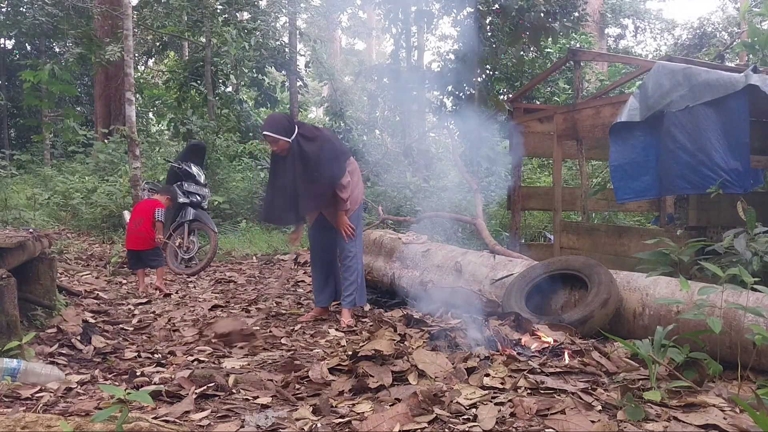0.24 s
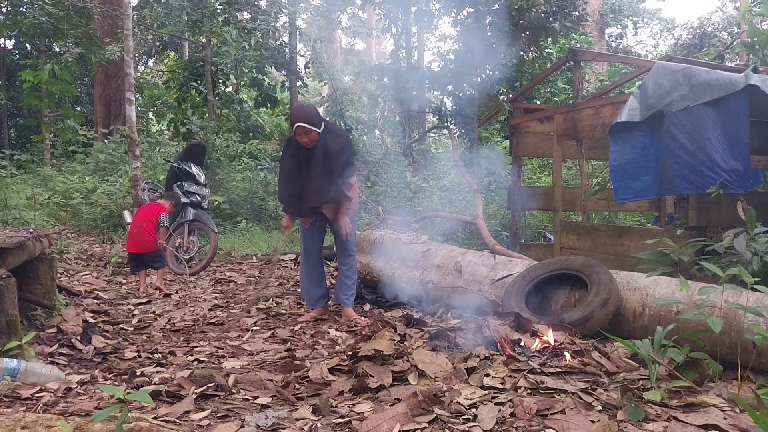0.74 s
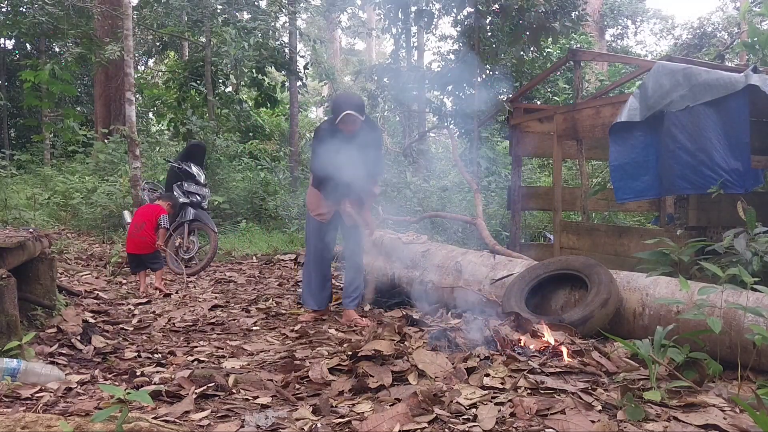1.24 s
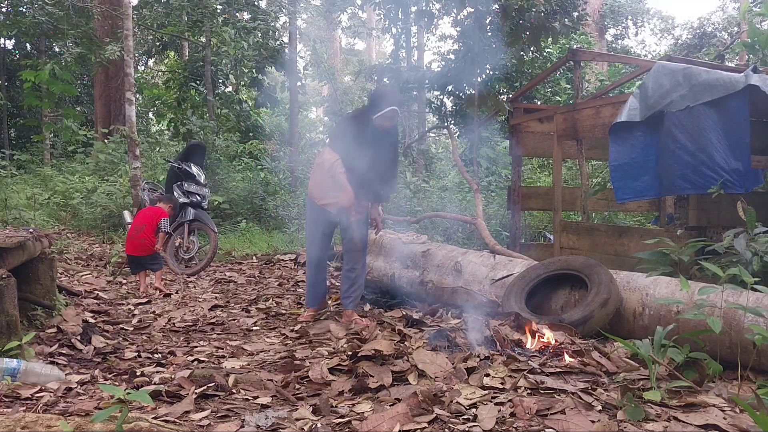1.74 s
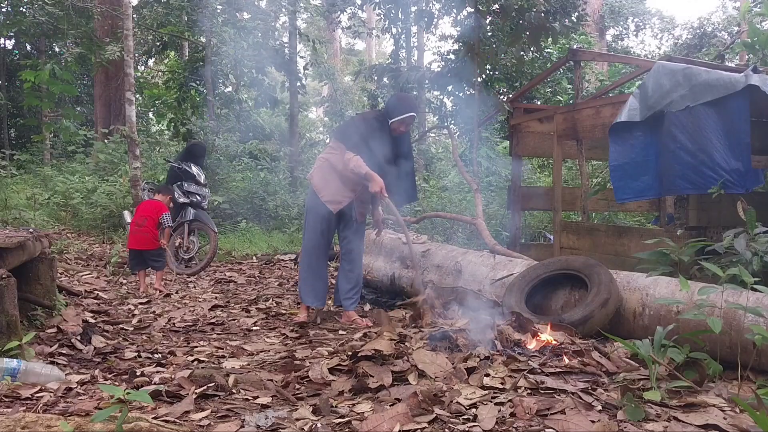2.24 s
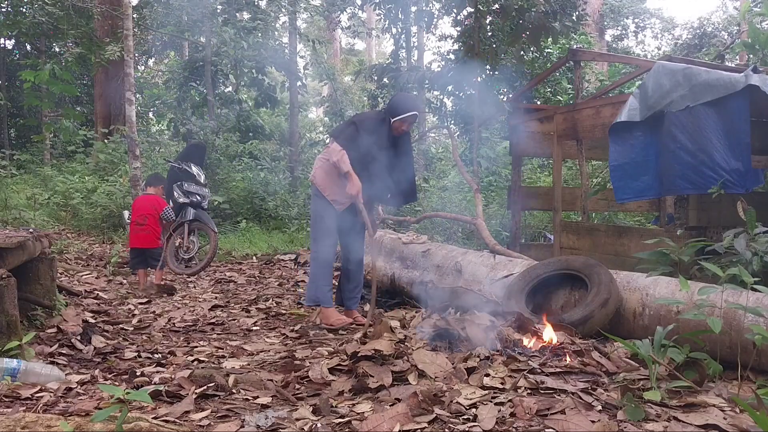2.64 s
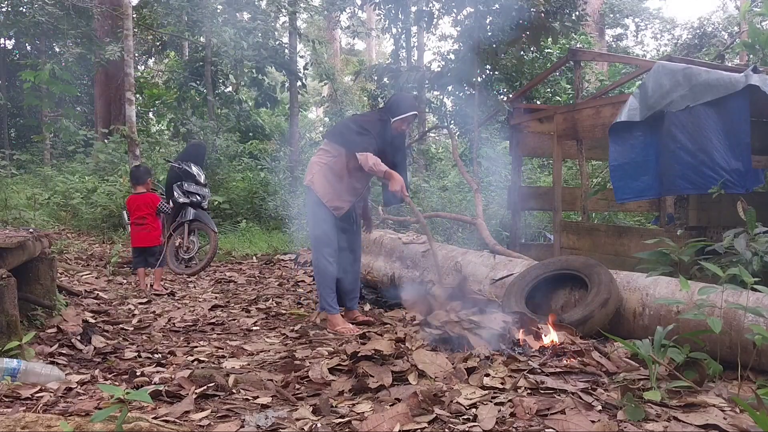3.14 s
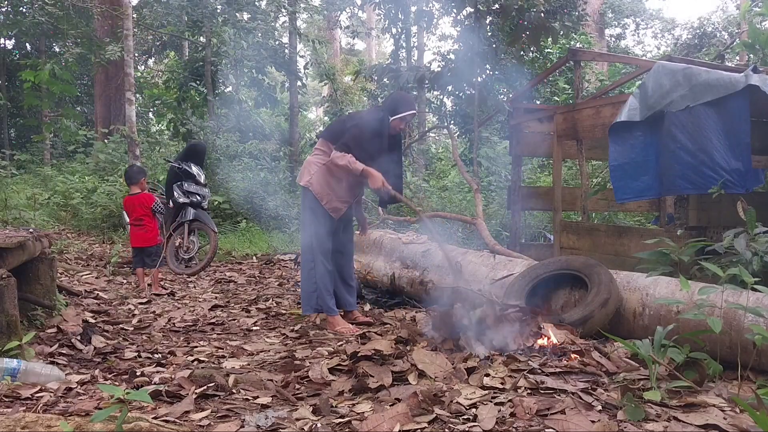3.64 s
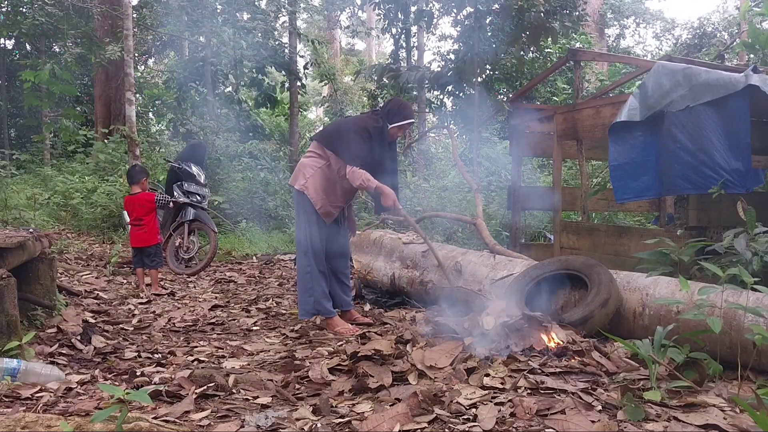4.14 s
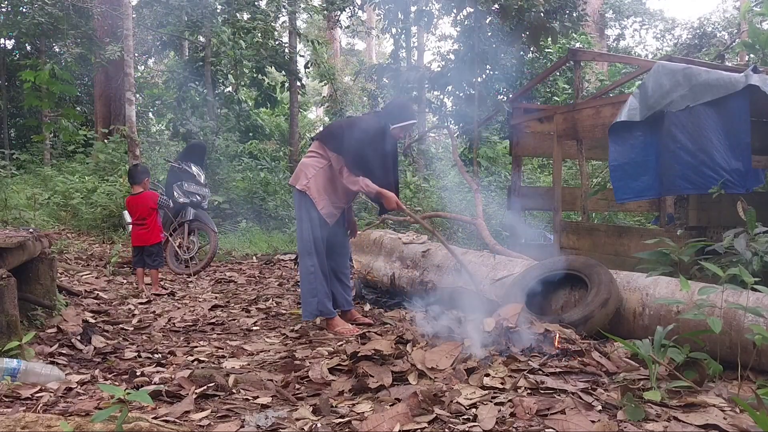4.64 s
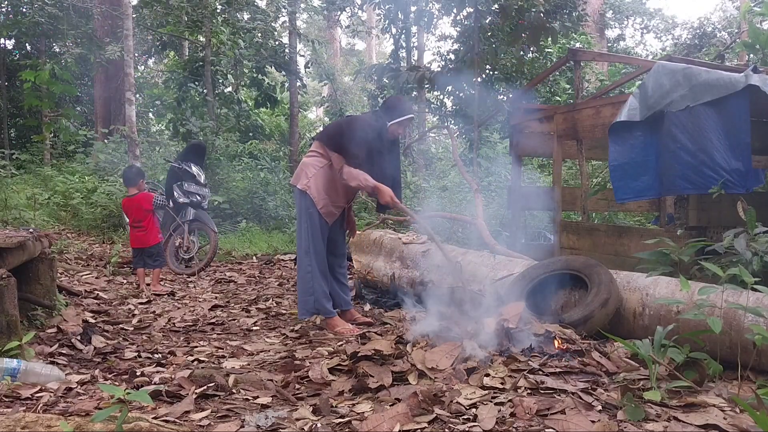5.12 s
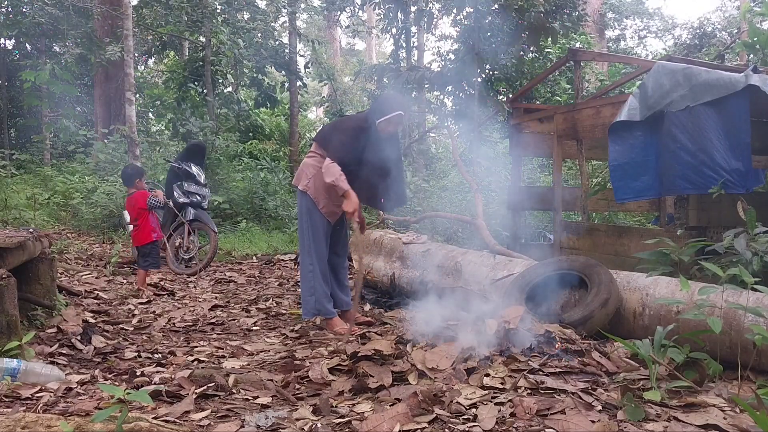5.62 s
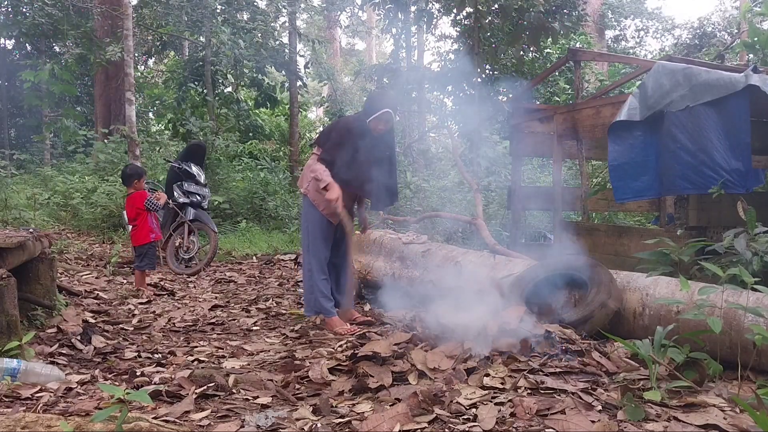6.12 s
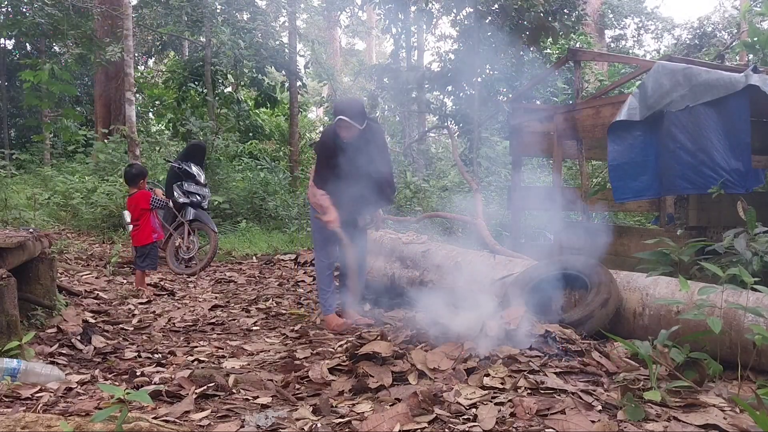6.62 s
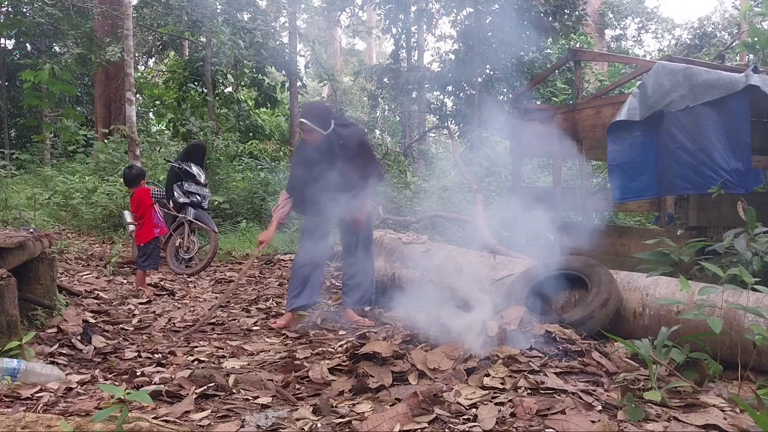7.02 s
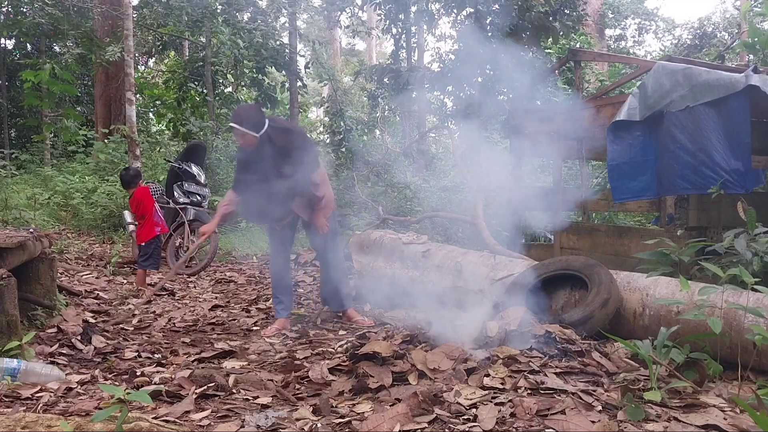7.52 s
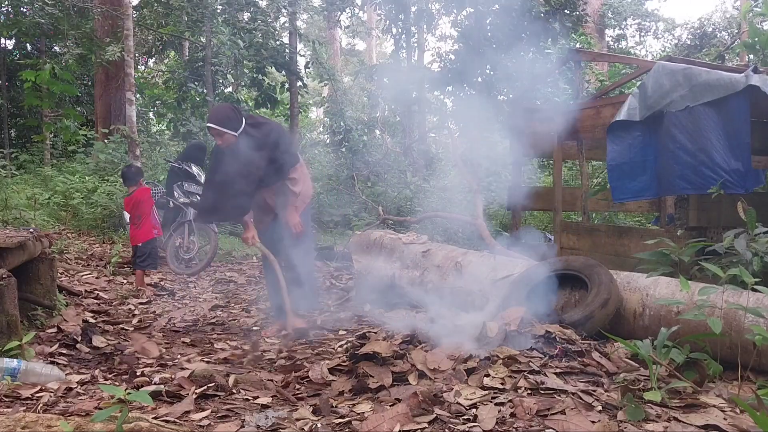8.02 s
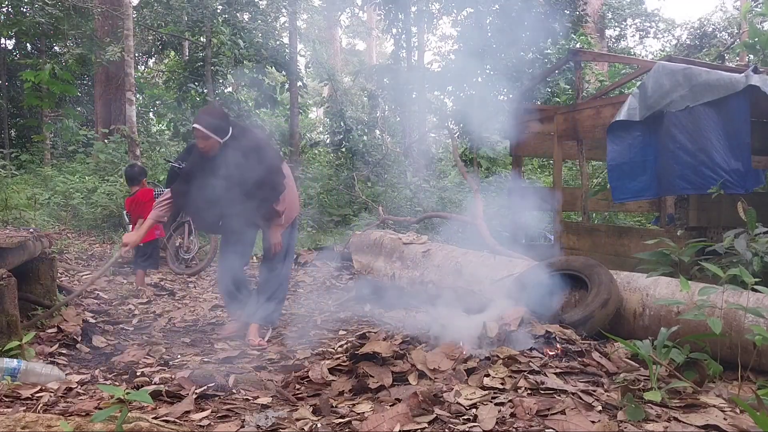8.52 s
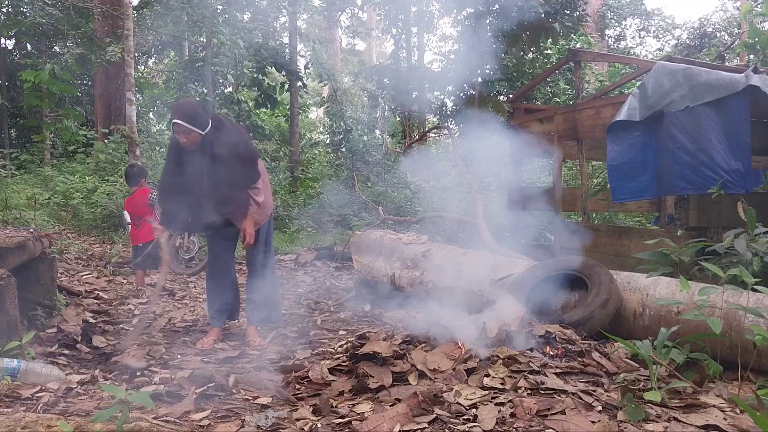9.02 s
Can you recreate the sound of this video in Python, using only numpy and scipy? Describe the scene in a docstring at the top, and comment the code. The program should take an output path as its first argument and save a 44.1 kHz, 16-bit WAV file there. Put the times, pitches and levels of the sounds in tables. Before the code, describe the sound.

A loud, needle-thin cicada whine near 12 kHz opens the scene, wavering and sinking slightly until it fades around 2.5 s, where a rough insect buzz swells. Beneath it lie a steady hissing insect chorus, a low distant trill in bouts and soft air. From 0.2 s a stick rakes dry leaves with crisp crunches and dull knocks; a harder poke hits at 1.0 s with bright twig snaps. At about 1.9 s a thick dry stick breaks, by far the sharpest sound, echoing briefly among trunks. Longer, softer rustles follow at 2.9 and 3.9 s, then firmer crunches at 5.0, 5.7 and 6.4 s. Fainter throbbing cicada calls come around 5.3, 7.3 and 9 s, with sliding lower insect tones near 7 s. Gentle raking at 7.8 s leads to a short, thudding crunch at 8.8 s. Faint ember ticks persist. Mono, close and dry.

```python
"""A cicada whines near 12 kHz over a steady insect chorus while a stick rakes a smouldering pile of dry leaves.
Leaves crumple in swarms of tiny ringing cracks; knocks, twig snaps and ember ticks are short rung noises.
A thick stick breaks once. Cicadas are unsteady gliding sines; the chorus, trill and buzzes are resonant noise.
Orchard trunks scatter a short echo of the work on the pile. One microphone feeds both channels."""
import sys
import numpy as np
from scipy import signal
from scipy.fft import irfft
from scipy.io import wavfile
from scipy.ndimage import uniform_filter1d

SR = 44100
rng = np.random.default_rng(int(sys.argv[2]) if len(sys.argv) > 2 else 0)


def waveform_to_disk(signal):
    """Save audio, clipped to [-1, 1], as 16-bit WAV at the path in sys.argv[1]."""
    frames = np.transpose(np.atleast_2d(signal))
    scaled = np.clip(frames, -1, 1) * 32767
    samples = np.round(scaled).astype(np.int16)
    wavfile.write(sys.argv[1], SR, samples)


N = 408807

# Spectrum of crisp leaf edges, shared by the litter and the embers.
# Each row: frequency in Hz, relative density in dB.
EDGE_SPECTRUM = [(500, -57), (1400, -4), (2600, -1), (4500, 2), (6500, 0), (9000, -6), (12500, 6.5),
                 (15500, -9.5)]


def undb(db):
    """Decibels to gain."""
    return 10 ** (np.asarray(db) / 20)


def unit(x):
    """Scale to a standard deviation of 1."""
    return x / (np.std(x) + 1e-12)


def noise():
    """White noise."""
    return rng.standard_normal(N)


def walk(rate):
    """Slow chance: random levels held 1 / rate s and slewed twice."""
    hold = max(int(SR / rate), 2)
    levels = rng.standard_normal(N // 20)[:N // hold + 1]
    held = np.repeat(levels, hold)[:N]
    return unit(uniform_filter1d(uniform_filter1d(held, hold), hold))


def colour(x, points):
    """Filter by a (Hz, dB) spectrum, keeping the power of white input."""
    hz, db = np.transpose(points)
    bins_hz = np.arange(N + 1) * SR / (2 * N)
    gain = undb(np.interp(np.log(bins_hz + 1), np.log(hz), db))
    response = irfft(gain / np.sqrt(np.mean(gain ** 2)))
    centred = np.roll(response, 1024)[:2049] * np.hanning(2049)
    return signal.fftconvolve(x, centred, "same")


def ring(x, hz, width_hz):
    """One resonance, gain 1 at its centre."""
    hz = min(hz, .45 * SR)
    b, a = signal.iirpeak(hz, hz / min(width_hz, SR / 4), fs=SR)
    return signal.lfilter(b, a, x)


def band(hz, width_hz):
    """Noise in a steep resonance: many insects, or one rough one."""
    return unit(ring(ring(noise(), hz, width_hz), hz, width_hz))


def track(rows, column):
    """One column of a curve at every sample."""
    rows = np.asarray(rows)
    return np.interp(np.arange(N) / SR, rows[:, 0], rows[:, column])


def gate(rows):
    """1 while a curve lasts, with soft ends."""
    t = np.arange(N) / SR
    inside = (t >= rows[0][0]) & (t <= rows[-1][0])
    return uniform_filter1d(1. * inside, SR // 18)


def swell(start, attack, hold, release):
    """Gain that rises evenly in dB, holds at 1 and dies away."""
    swell_db = 20  # an attack rises, and a release falls, by this much
    t = np.arange(N) / SR - start
    before = 1 - t / max(attack, 1e-3)
    after = (t - attack - hold) / max(release, 1e-3)
    return undb(-swell_db * np.clip(np.maximum(before, after), 0, 10))


def glide(start, first_hz, hz_per_s):
    """Pitch that slides evenly through a phrase."""
    return first_hz + hz_per_s * (np.arange(N) / SR - start)


def turn(hz, wander_hz):
    """Phase of a pitch that wanders a little."""
    return 2 * np.pi * np.cumsum(hz + wander_hz * walk(45)) / SR


def unsteady(rms, waver_db):
    """Sine amplitude around an rms level, never quite steady."""
    return np.sqrt(2) * rms * undb(waver_db * walk(38))


def grains(rate, spread_db):
    """Tiny cracks at random moments (rate per second), most faint and a few strong."""
    size = undb(spread_db * np.minimum(rng.exponential(size=N), 5))
    struck = rng.random(N) < rate / SR
    return unit(struck * size * np.sign(noise()))


def burst(t60):
    """A quarter second of noise that falls 60 dB in t60 seconds."""
    t = np.arange(SR // 4) / SR
    return rng.standard_normal(len(t)) * np.exp(-np.log(1000) * t / max(t60, 1e-3))


def add(out, s, x, peak_db):
    """Mix a short sound in at s seconds with the given peak."""
    i = max(int(s * SR), 0)
    scaled = x * undb(peak_db) / np.abs(x).max()
    out[i:i + len(x)] += scaled[:N - i]


def crumple(rate, spread_db, cycles, flicker_db):
    """Leaves of many sizes: each size cracks by itself and rings briefly; whole leaves give way together."""
    together, out = grains(rate, spread_db), 0
    for hz in np.geomspace(150, 13000, 10):
        cracks = grains(rate, spread_db) + 0.66 * together
        out = out + ring(cracks, hz, hz / cycles) * undb(flicker_db * walk(70))
    return unit(out)


def near_cicada(rms, low_rms, hz, sides_db, rasp_db, hiss_db, waver_db):
    """A stack whose fourth partial, the whine, rings far above the rest, with flutter side tones and a rasp."""
    # Partials beside the whine. Each row: multiple of the fundamental, relative level in dB.
    partial_rows = [(1, 0), (2, -9.5), (3, -14), (5, -10)]
    # Side tones from tymbal flutter. Each row: offset from the whine in Hz, relative level in dB.
    flutter_rows = [(-684, -38), (-342, -19.5), (-265, -31), (-165, -29), (-78, -24), (165, -33),
                    (265, -31), (342, -27), (684, -41)]
    phase = turn(hz, wander_hz=2.43)
    loud = unsteady(rms, waver_db=waver_db)
    effort = uniform_filter1d(loud, SR // 3, mode="reflect")  # only the whine itself fades in and out quickly
    t = np.arange(N) / SR
    # the fundamental lies two octaves below the whine
    stack = sum(undb(db + 1.6 * walk(16)) * np.sin(k * phase / 4) for k, db in partial_rows)
    sides = 0
    for offset_hz, db in flutter_rows:
        sides = sides + undb(db + 2.6 * walk(21)) * np.sin(phase + 2 * np.pi * offset_hz * t)
    rasp = walk(600) * np.sin(phase) + walk(600) * np.cos(phase)
    hiss = band(hz=6970, width_hz=2800)  # the buckling tymbals also hiss broadly
    fringe = effort * (undb(sides_db) * sides + undb(rasp_db) * rasp + undb(hiss_db) * hiss)
    return loud * np.sin(phase) + fringe + np.sqrt(2) * low_rms * stack


def near_singer(calls_low_db=-26.5, song_low_db=1.0):
    """One long song that sinks in pitch, then short, hoarser calls that rise and throb."""
    # The long song's whine. Each row: time in seconds, level in dB.
    song_curve = [(0.0, -14.5), (0.06, -18.5), (0.39, -12), (0.41, -14.5), (0.58, -12), (1.07, -18.5),
                  (1.15, -11.5), (1.22, -19.5), (1.46, -11.5), (1.75, -23), (1.77, -33), (1.8, -20.5),
                  (2.2, -30.5), (2.34, -24), (2.46, -27), (2.54, -52)]
    # Its fundamental and other partials. Each row: time in seconds, level in dB ahead of song_low_db.
    song_low_curve = [(0.0, -40), (0.19, -52), (0.36, -41), (0.68, -39.5), (1.16, -35.5), (2.2, -46),
                      (2.3, -66)]
    # Short calls. Each row: start, attack, hold and release in seconds, level in dB ahead of the throb,
    # first pitch in Hz, glide in Hz/s, moment of one throb peak in seconds.
    call_rows = [(5.3, .28, .3, .38, -27.5, 11792, 157, 5.4), (7.29, .32, .42, .2, -25, 11794, 170, 7.34),
                 (9.0, .28, .1, .2, -37, 11797, 150, 9.22)]
    throb_hz, throb_db = 7.1, 2
    low_growth = 0.71  # dB that a call's lower partials gain for each dB of its swell
    t = np.arange(N) / SR
    song = gate(song_curve) * undb(track(song_curve, column=1))
    low = gate(song_low_curve) * undb(track(song_low_curve, column=1) + song_low_db)
    song_hz = glide(0, first_hz=12088, hz_per_s=-73)
    out = near_cicada(song, low, song_hz, sides_db=1.7, rasp_db=-26, hiss_db=-26.5, waver_db=1.66)
    for start, attack, hold, release, db, first_hz, hz_per_s, throb_s in call_rows:
        shape = swell(start, attack, hold, release)
        throb = throb_db * np.cos(2 * np.pi * throb_hz * (t - throb_s))
        call = undb(db + throb) * shape
        low = undb(calls_low_db) * (undb(db) * shape) ** low_growth
        call_hz = glide(start, first_hz, hz_per_s)
        out += near_cicada(call, low, call_hz, sides_db=4.5, rasp_db=-12.5, hiss_db=-19.5, waver_db=3.5)
    return out


def insect_chorus():
    """Countless distant insects merge into steady resonant bands."""
    # Each row: centre in Hz, width in Hz, level in dB.
    chorus_rows = [(2910, 290, -57), (6795, 870, -42), (7240, 790, -42)]
    return sum(undb(db + 0.24 * walk(9.7)) * band(hz, width) for hz, width, db in chorus_rows)


def orchard_air(air_db=-40.5):
    """The hush of the trees: coloured noise whose level drifts slightly."""
    # Each row: frequency in Hz, relative density in dB.
    air_spectrum = [(25, -28), (55, -2.5), (110, -1), (220, 0), (400, -10), (700, -12), (1250, -21.5),
                    (2000, -10), (4000, -10), (5800, -10), (8500, -6), (10000, -8), (13500, -3),
                    (15500, -9)]
    return undb(air_db + .5 * walk(2.17)) * colour(noise(), air_spectrum)


def insect_trill(trill_hz=1735, trill_width_hz=140):
    """A far insect's low trill: narrow noise that swells in bouts."""
    # Each row: start, attack, hold and release in seconds, level in dB.
    trill_rows = [(-.1, 0.11, 1.95, 1.6, -48), (2.61, 0.84, 2.7, .7, -53), (7.95, 0.29, 1, .3, -51)]
    bouts = sum(undb(db) * swell(*times) for *times, db in trill_rows)
    return bouts * band(trill_hz, trill_width_hz)


def sliding_whines(sliders_db=2.0):
    """Lower insect tones slide in pitch and stutter in quick, uneven pulses; the first row is instead the near
    cicada's own tone an octave below its whine, pulsing in the same way."""
    # Each row: start, attack, hold and release in seconds, level in dB ahead of sliders_db,
    # first pitch in Hz, glide in Hz/s.
    slider_rows = [(-.1, .1, .55, .5, -44, 6048, -36), (-.1, .1, .45, 1, -44, 5996, -65),
                   (1.55, .55, .25, .6, -50, 2690, 105), (5.85, .45, .1, .4, -54, 2635, 200),
                   (6.55, .3, .55, .8, -52.5, 2715, 95), (6.55, .2, .45, .3, -60, 5490, 60),
                   (6.6, .2, .35, .2, -58, 4200, 30), (6.6, .35, .15, .4, -58, 1830, 10),
                   (7.12, .33, .22, .25, -46.5, 2528, 255), (7.1, .35, .25, .3, -54, 2283, 235),
                   (8.1, .3, .85, .3, -58.5, 2755, 125)]
    out = np.zeros(N)
    for start, attack, hold, release, db, first_hz, hz_per_s in slider_rows:
        phase = turn(glide(start, first_hz, hz_per_s), wander_hz=12)
        pulsing = np.hypot(walk(90), 1) / np.sqrt(2)
        level = undb(db + sliders_db) * swell(start, attack, hold, release)
        out += pulsing * unsteady(level, waver_db=3.0) * np.sin(phase)
    return out


def litter(heap_db=1.0, edges_db=6.0, thud_db=-1.5, thud_hz=320, thud_width_hz=400, catch_db=0.47, clump_db=2.2):
    """Each rake or step brushes the crisp top leaves, crushes the heap and thuds as deep as it digs."""
    # Rakes and steps. Each row: start, attack, hold and release in seconds, then levels in dB ahead of
    # the layer gains above: crushing of the heap, crisp leaf edges, low thud relative to the crushing.
    stroke_rows = [(-.1, 0.16, 0.16, .1, -56, -42.5, -3.5), (0.198, 0.024, 0.079, .3, -35, -40.5, -3),
                   (0.239, 0.13, 0.1, 0.21, -36, -34.5, -5.5), (0.55, 0.089, .03, 0.31, -49, -41, -3),
                   (0.921, 0.11, 0.14, 0.32, -37, -36, -8), (1.016, .015, .03, .08, -33.5, -37, -0.5),
                   (1.862, 0.019, .01, 0.25, -45, -34, -7), (1.866, 0.13, 0.02, 0.34, -34, -37.5, -10),
                   (2.247, .16, .02, 0.085, -41.5, -40.5, -10), (2.904, 0.024, .025, 0.11, -39, -41, -9),
                   (2.852, .2, .24, 0.49, -39, -45, -4.5), (3.904, 0.19, 0.23, 0.57, -39.5, -45, -5),
                   (5.006, 0.059, 0.099, 0.12, -32.5, -36, -1.5),
                   (5.71, 0.11, 0.038, 0.17, -34, -31.5, -9.5), (6.437, 0.013, 0.094, 0.16, -43, -35, -14),
                   (6.425, 0.091, .04, 0.13, -32.5, -44, -11), (7.144, 0.19, 0.043, 0.27, -43, -49, -11),
                   (7.724, 0.13, .03, .2, -46.5, -39, 0), (7.787, 0.12, 0.088, 0.3, -38.5, -37, -5),
                   (8.737, .014, 0.066, 0.21, -41.5, -36.5, 2.5),
                   (8.767, 0.036, .012, 0.047, -30.5, -39, 6)]
    # Crushed heap. Each row: frequency in Hz, relative density in dB.
    heap_spectrum = [(40, -21), (90, -12), (170, -4), (300, -9), (600, -0.5), (1100, -2.5), (1800, -3.5),
                     (2500, -3.5), (3500, -6.5), (7000, -33)]
    heap_lag_s = 0.004  # the top leaves are touched before the heap gives way
    settling = 1.28  # and they go on settling this many times longer
    crush, dig, brush = np.zeros((3, N))
    for start, attack, hold, release, crush_db, brush_db, depth_db in stroke_rows:
        push = undb(crush_db) * swell(start + heap_lag_s, attack, hold, release)
        crush = np.maximum(crush, push)
        dig = np.maximum(dig, undb(depth_db) * push)
        brush = np.maximum(brush, undb(brush_db) * swell(start, attack, hold, release * settling))
    heap = unit(colour(crumple(rate=750, spread_db=2.5, cycles=1.53, flicker_db=2), heap_spectrum))
    thud = ring(grains(rate=400, spread_db=2.0), thud_hz, thud_width_hz)
    thud = unit(ring(thud, thud_hz, thud_width_hz))
    edges = unit(colour(crumple(rate=3000, spread_db=3.5, cycles=0.98, flicker_db=2.5), EDGE_SPECTRUM))
    # the stick catches and slips, so the heap gives way in clumps
    catch = undb(catch_db * walk(90) + clump_db * walk(28))
    body = undb(heap_db) * crush * heap + undb(thud_db) * dig * thud
    return catch * body + undb(edges_db) * brush * edges


def embers(level_db=-57):
    """Sparse faint ticks of the smouldering pile."""
    ticks = crumple(rate=12, spread_db=3, cycles=1.8, flicker_db=1)
    return undb(level_db) * unit(colour(ticks, EDGE_SPECTRUM))


def buzzes():
    """Rough swells of the tymbals, from a narrow buzz to a broad insect hiss."""
    # Each row: middle in seconds, half length in seconds, centre in Hz, width in Hz, level in dB.
    buzz_rows = [(0.04, 0.14, 2880, 150, -41), (0.2, 0.45, 5130, 600, -44),
                 (2.403, 0.12, 11900, 517, -28.5), (2.425, 0.079, 2890, 352, -37.5),
                 (2.78, 0.24, 2490, 550, -46), (2.8, 0.81, 4340, 2200, -49.5), (7.0, 1, 4320, 2400, -52)]
    t = np.arange(N) / SR
    out = np.zeros(N)
    for s, length, hz, width, db in buzz_rows:
        out += undb(db) * np.exp(-((t - s) / length) ** 2) * band(hz, width)
    return out


def knocks(damping=0.48):
    """Blows of stick and heel on the padded ground die within a few cycles."""
    # Each row: start in seconds, peak in dB, pitch in Hz, 60 dB decay of the striking noise in seconds.
    knock_rows = [(0.226, -25.5, 260, 0.026), (0.289, -21, 320, 0.025), (0.391, -19, 1020, 0.051),
                  (0.498, -20.5, 840, 0.022), (1.034, -11, 1800, 0.034), (1.04, -17.5, 570, 0.029),
                  (1.037, -19, 1870, .02), (3.956, -19, 2230, 0.0086), (5.14, -26, 1110, 0.013),
                  (5.149, -18, 304, 0.019), (8.073, -23, 680, 0.017), (8.806, -17.5, 272, 0.028),
                  (8.812, -21, 1900, 0.022), (8.814, -16.5, 560, .06), (8.821, -19, 244, 0.015)]
    out = np.zeros(N)
    for s, db, hz, t60 in knock_rows:
        blow = ring(burst(t60), hz, damping * hz)
        add(out, s, ring(blow, hz, 2 * hz), db)
    return out


def snaps(t60=0.012, damping=0.99):
    """Thin twigs and embers crack with one short resonant tick."""
    # Each row: start in seconds, peak in dB, centre of the resonance in Hz.
    snap_rows = [(0.841, -13, 8500), (1.003, -19, 4300), (1.154, -15, 6200), (1.159, -10.5, 5500),
                 (1.753, -12, 7000), (1.848, -8, 12900), (2.425, -21, 6000), (2.766, -27, 7950),
                 (2.83, -18, 12000), (3.28, -22, 13000), (3.658, -17, 11000), (5.076, -18, 3800),
                 (5.141, -12.5, 3170), (5.876, -10.5, 4160), (6.083, -25, 1100), (6.267, -20, 6040),
                 (6.335, -27, 3900), (7.371, -21, 9000), (8.155, -19, 5500), (8.222, -19.5, 4770),
                 (8.752, -17.5, 4700), (8.785, -15, 12000), (8.792, -16, 5000)]
    out = np.zeros(N)
    for s, db, hz in snap_rows:
        tick = ring(burst(t60), hz, damping * hz)
        add(out, s, ring(tick, hz, damping * hz), db)
    return out


def breaking_stick(break_s=1.8752, peak_db=-1, tear_s=0.0032):
    """One thick dry stick breaks: its fibres tear within a few milliseconds and ring the wood."""
    # Modes of the wood. Each row: frequency in Hz, width in Hz, relative level in dB.
    mode_rows = [(2090, 300, -3), (2820, 320, 3), (4370, 320, -6), (5100, 300, -0.5), (6320, 500, -1.5),
                 (7520, 650, 3), (10900, 6400, -4.5)]
    out, tear = np.zeros(N), burst(0.035)
    tear *= np.exp(-(np.arange(len(tear)) / SR / tear_s) ** 4)
    wood = sum(undb(db) * ring(ring(tear, hz, width), hz, hz) for hz, width, db in mode_rows)
    add(out, break_s, wood, peak_db)
    return out


def far_cicadas(low_db=-20, middle_db=-20):
    """Distant neighbours: gliding whines with faint tones one and two octaves below."""
    # Each row: start, attack, hold and release in seconds, level in dB, first pitch in Hz, glide in Hz/s.
    far_rows = [(2.4, .1, 3.9, .25, -40, 11804, -100), (2.4, .1, 1.5, 3, -46, 12090, -85),
                (3.95, .2, .08, .25, -34, 11647, -100), (6.45, .1, .33, .15, -53, 11815, -14),
                (7.02, .27, .74, .2, -40.5, 11183, 37), (8.05, .2, .04, .3, -42, 11775, -14),
                (8.3, .1, .5, .3, -52, 11750, 30), (8.9, .17, .2, .3, -43, 11300, 200)]
    out = np.zeros(N)
    for start, attack, hold, release, db, first_hz, hz_per_s in far_rows:
        phase = turn(glide(start, first_hz, hz_per_s), wander_hz=3.0)
        voice = np.sin(phase) + undb(middle_db) * np.sin(phase / 2) + undb(low_db) * np.sin(phase / 4)
        out += unsteady(undb(db) * swell(start, attack, hold, release), waver_db=3.0) * voice
    return out


def trunks(x, t60=0.4, gap_s=.003):
    """Echo scattered back by trunks and the shed, with little bass or top."""
    t = np.arange(SR) / SR
    tail = grains(4000, 2.5)[:SR] * (t > gap_s) * np.exp(-np.log(1000) * t / t60)
    tail = ring(tail, 4100, 9900)
    return signal.fftconvolve(x, tail / np.sqrt(np.sum(tail ** 2)))[:N]


def scene(echo_db=-13, break_echo_db=-3):
    """Everything reaches one microphone, so both channels are alike; only work on the pile echoes."""
    insects = near_singer() + insect_chorus() + insect_trill() + sliding_whines() + buzzes() + far_cicadas()
    work = litter() + embers() + knocks() + snaps()
    crack = breaking_stick()
    echo = trunks(undb(echo_db) * work + undb(break_echo_db) * crack)
    mono = insects + orchard_air() + work + crack + echo
    return np.array([mono, mono])


def record(dry):
    """The recorder cuts the top with a steep low-pass."""
    top_hz = 15450
    low_pass = signal.ellip(10, .1, 80, top_hz, fs=SR, output="sos")
    return signal.sosfilt(low_pass, dry)


dry = scene()
out = record(dry)
waveform_to_disk(out)
```